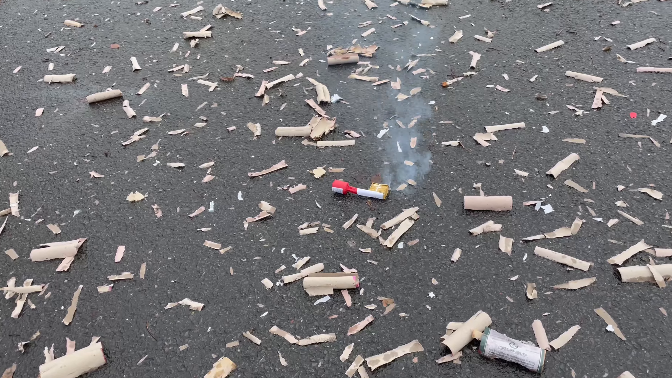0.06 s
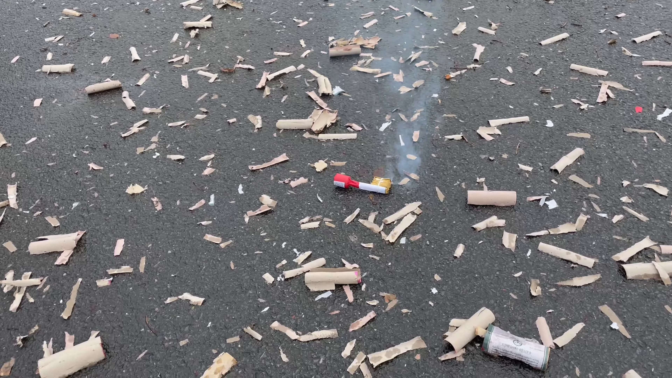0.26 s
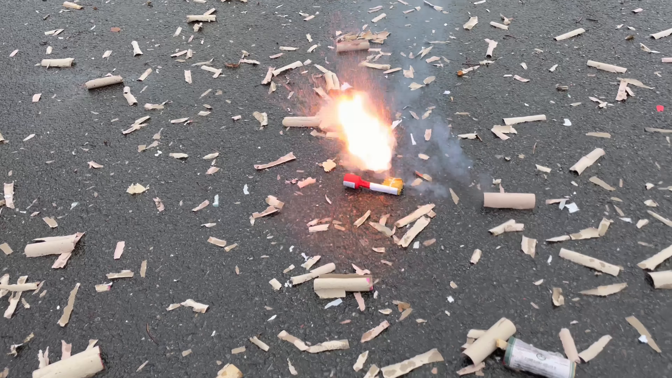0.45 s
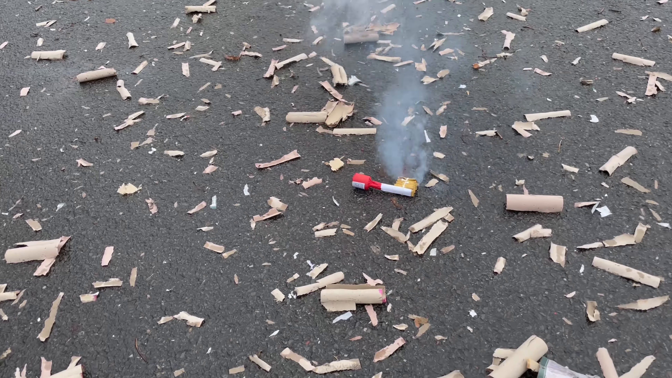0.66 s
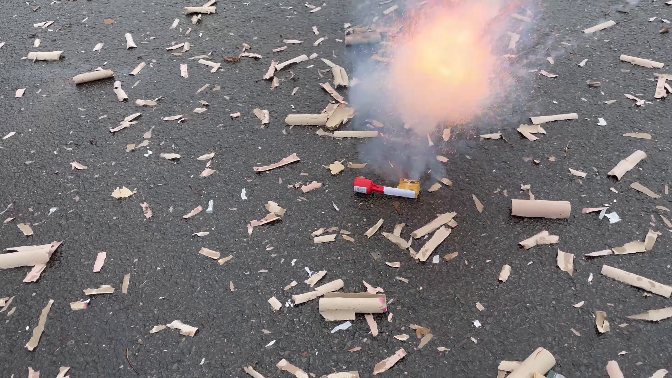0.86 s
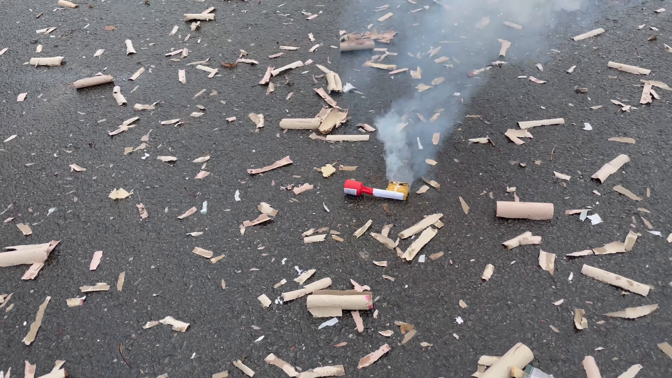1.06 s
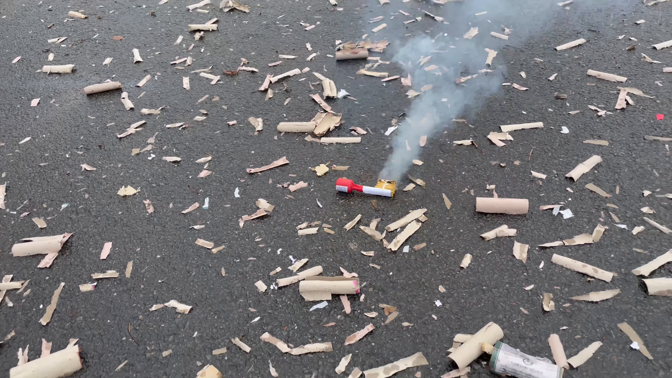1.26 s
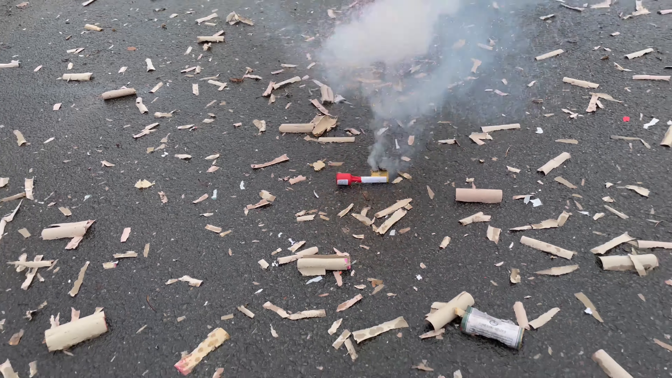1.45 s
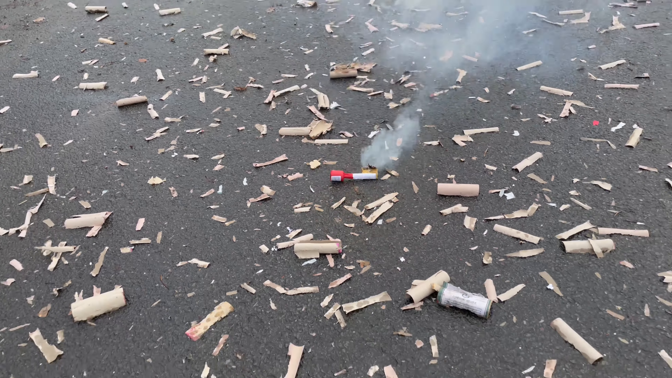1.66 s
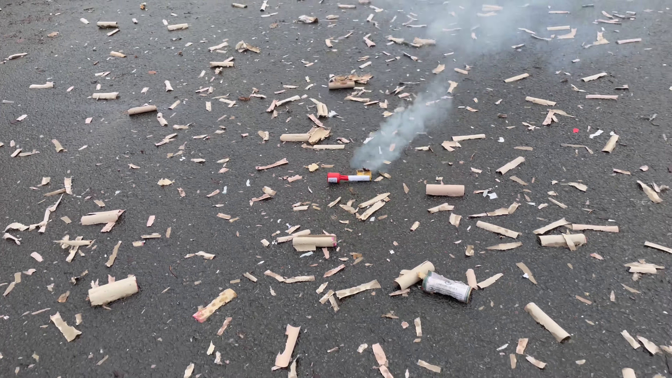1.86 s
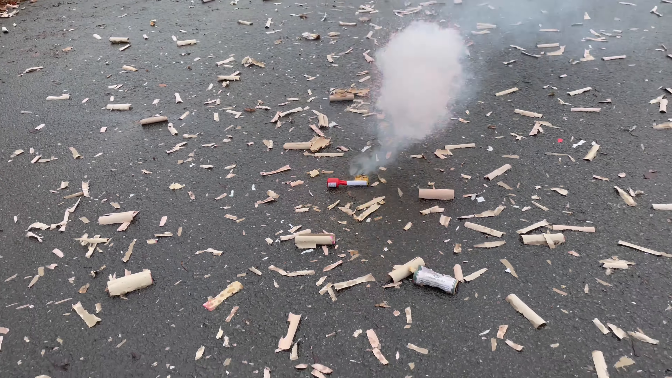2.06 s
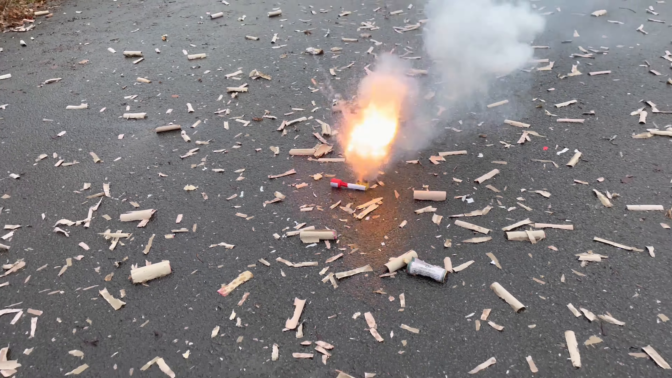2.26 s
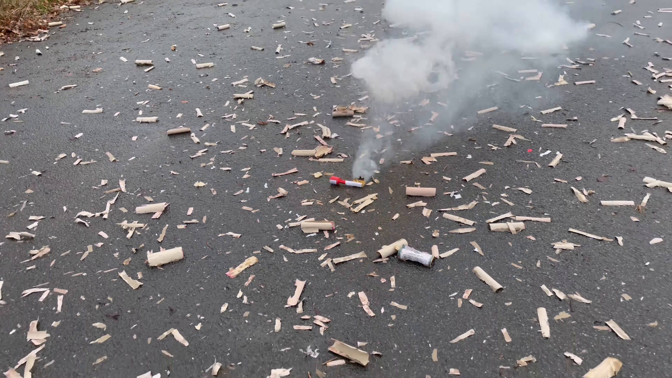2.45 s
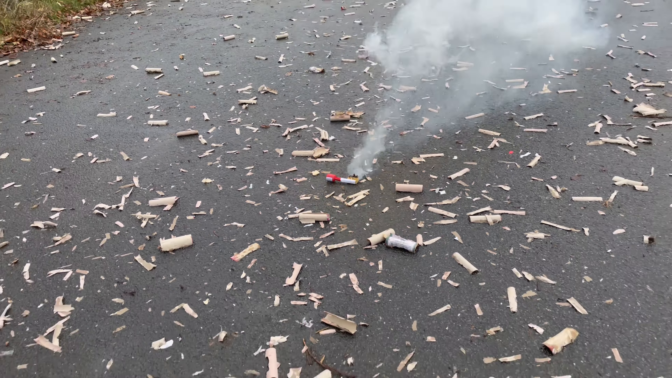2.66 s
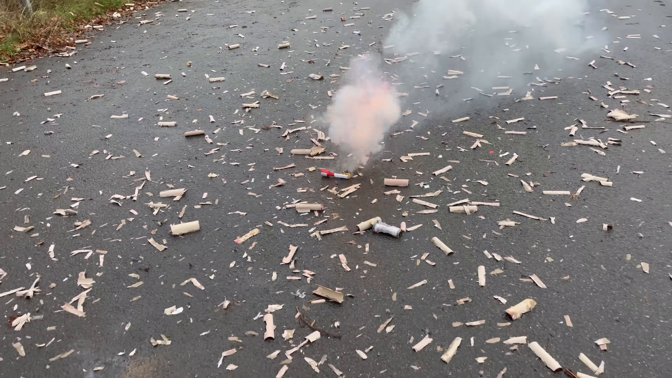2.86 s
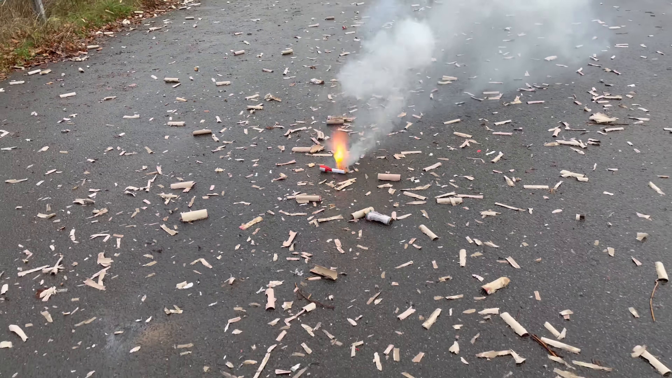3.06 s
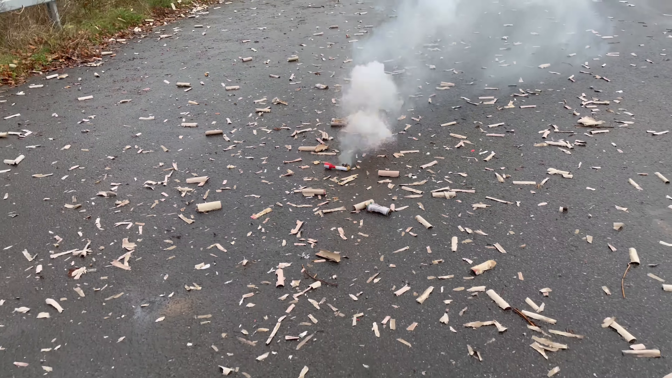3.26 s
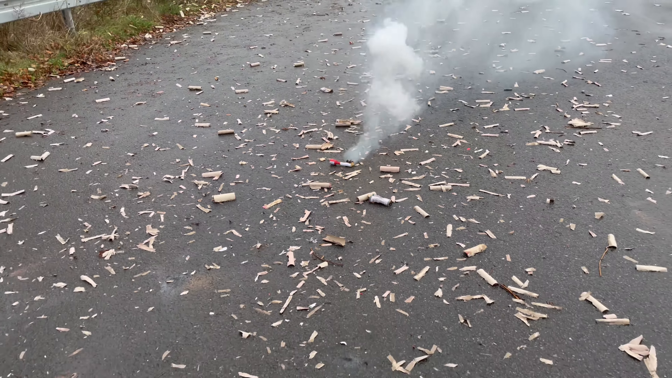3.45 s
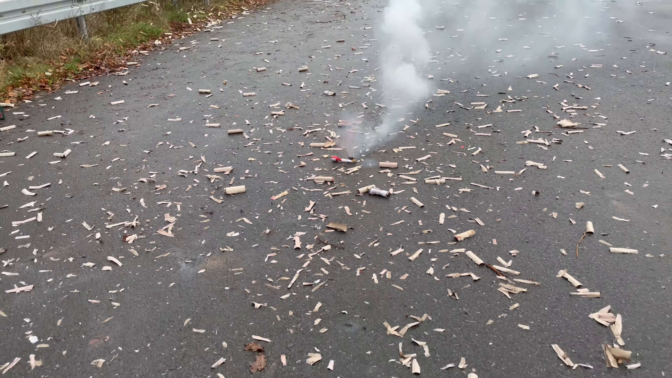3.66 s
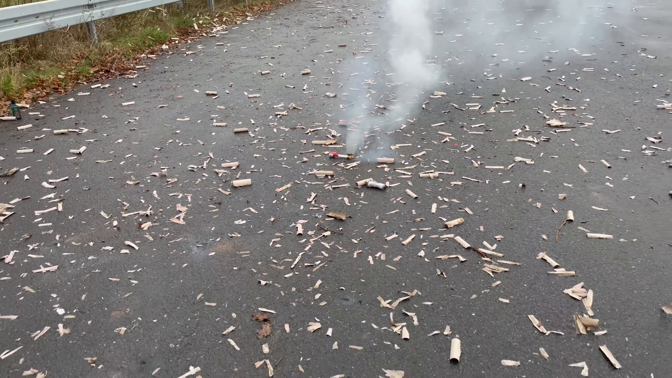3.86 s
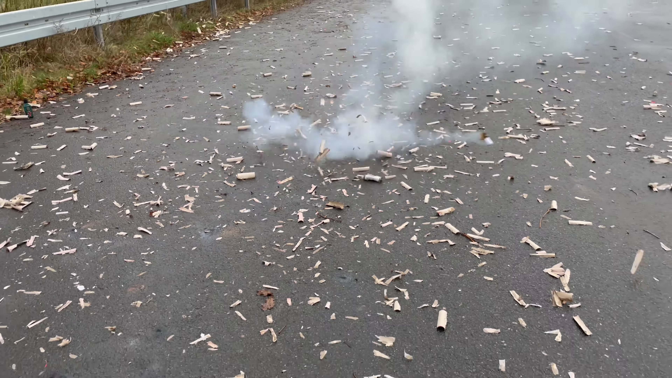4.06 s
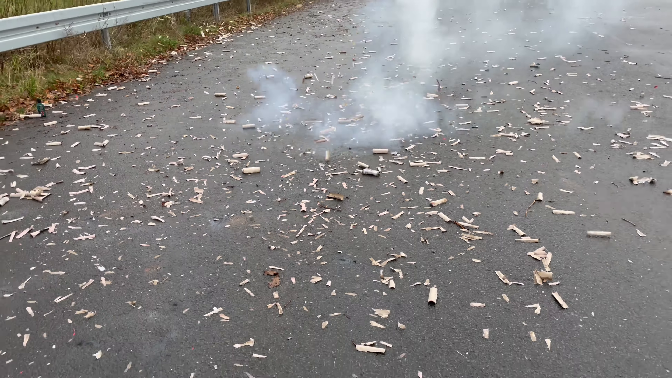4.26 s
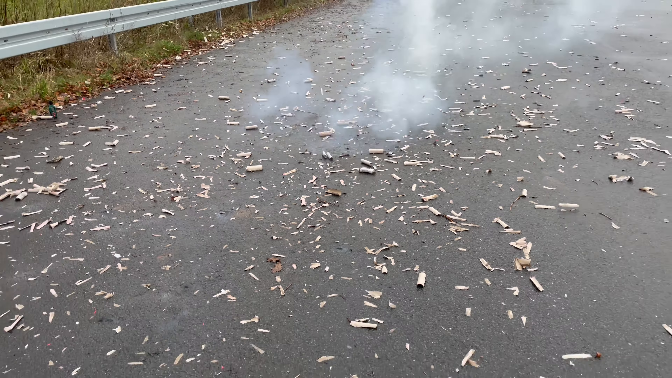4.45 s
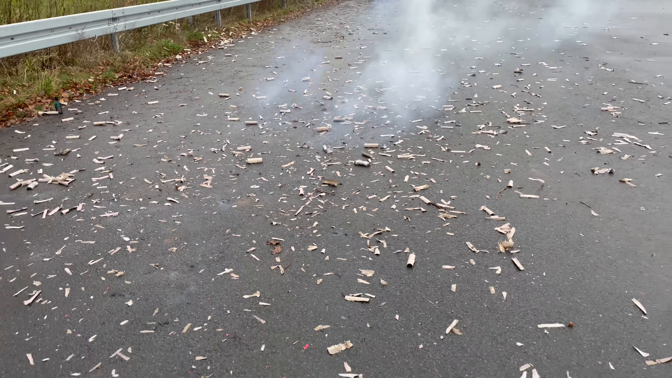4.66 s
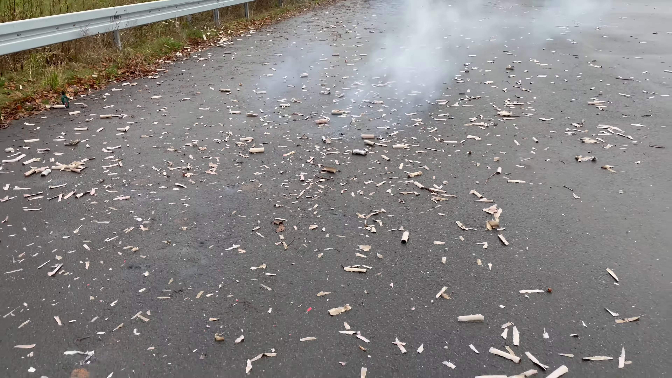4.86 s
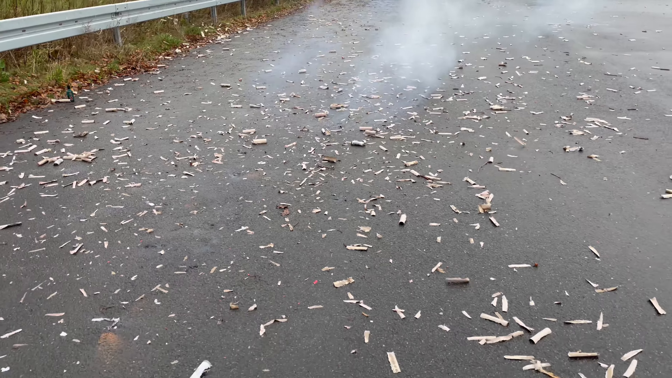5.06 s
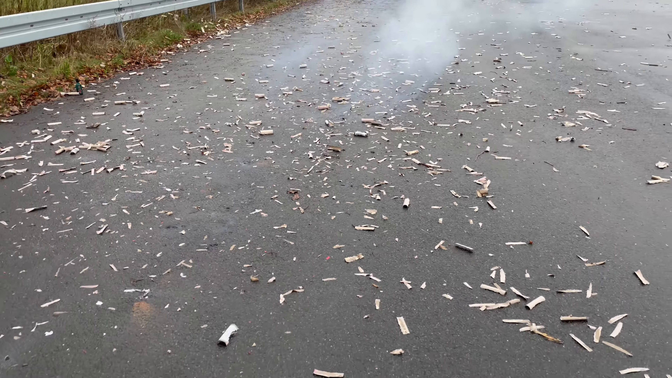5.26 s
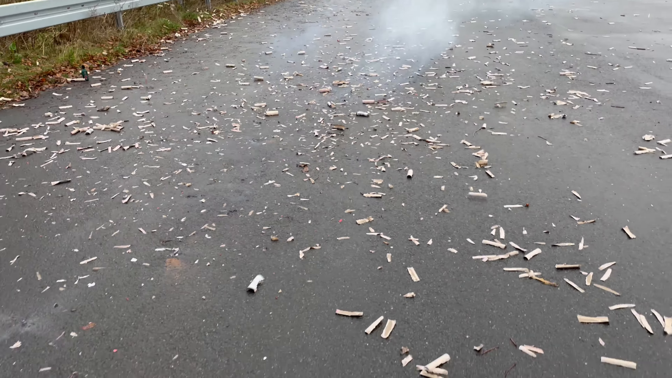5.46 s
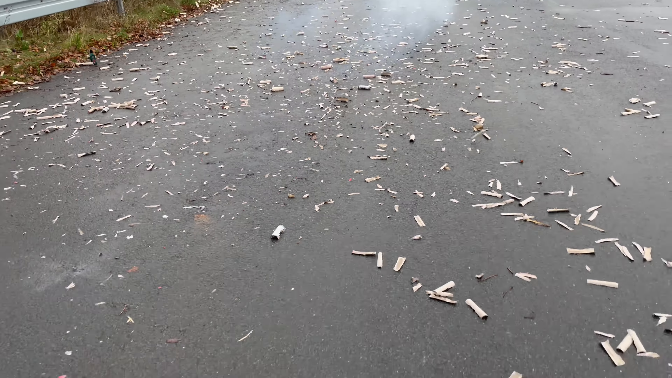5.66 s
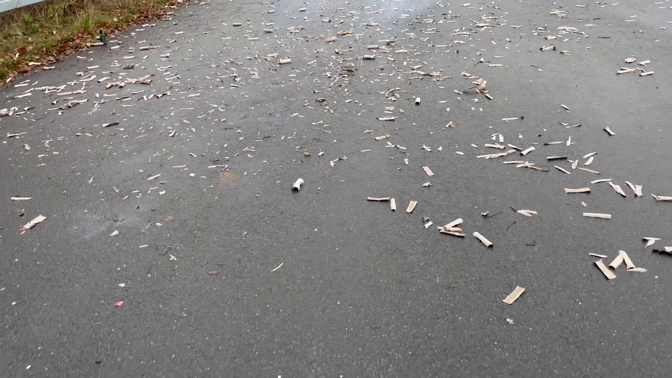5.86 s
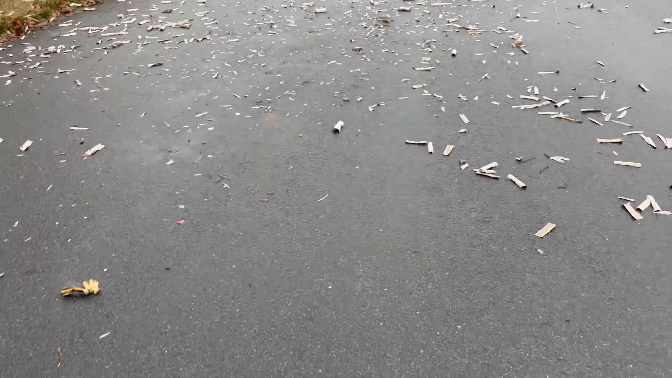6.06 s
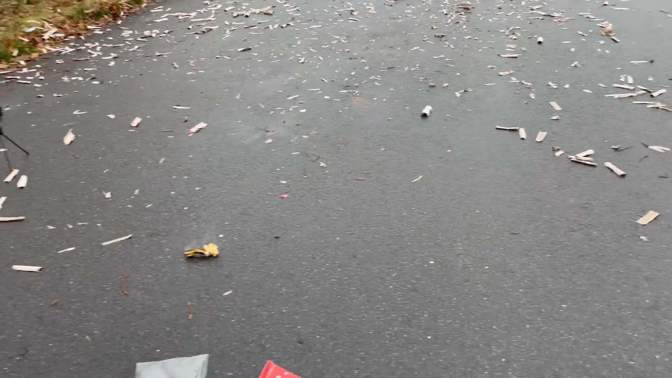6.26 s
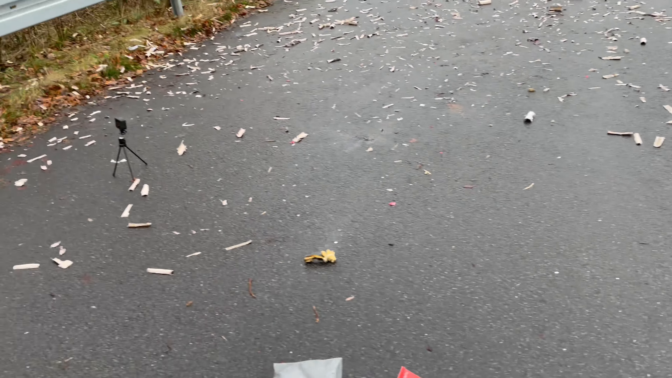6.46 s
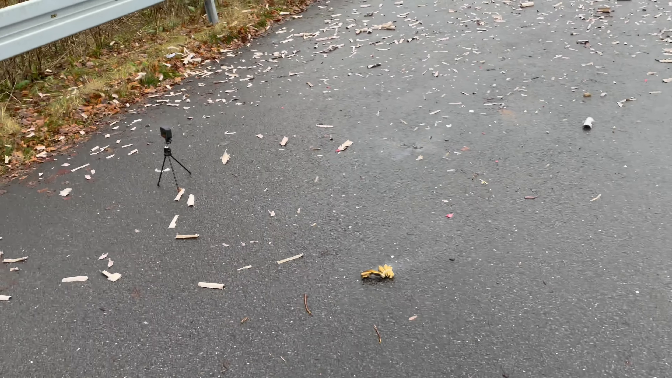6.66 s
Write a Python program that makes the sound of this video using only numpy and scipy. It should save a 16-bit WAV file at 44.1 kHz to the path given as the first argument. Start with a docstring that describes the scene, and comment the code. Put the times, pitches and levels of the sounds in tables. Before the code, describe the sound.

A fuse spits and hisses, then dry firecracker bangs come singly and in close pairs, slightly left, with short grainy reflections from verge and trees. A hiss flares before the eighth, weaker one; the ninth is deeper and louder, its long wash sinking in pitch. Wind rumbles throughout in short swells, finally thudding and crackling hard at the microphone, mostly left, over faint cloth-like brushing.

```python
"""Eight sharp bangs of a firecracker on a wet road, a fuse hissing between them, then a ninth, bigger burst.
Each bang is a swelling rush of gas noise, a spitting noise crack with a shock, and a thump falling in pitch.
A near slap, single echoes and a grainy wash from verge and woods answer, all filtered from the same blast.
Wind noise rumbles and buffets the two microphone ports; close by, soft noise rustles and two sines squeak."""
import sys
import numpy as np
from scipy import signal
from scipy.fft import rfft, irfft
from scipy.io import wavfile
from scipy.ndimage import uniform_filter1d

SR = 44100
rng = np.random.default_rng(int(sys.argv[2]) if len(sys.argv) > 2 else 0)


def inscribe(sig):
    """Save sig as 16-bit PCM at rate SR to the path in sys.argv[1].

    A 1-D sig is mono; a 2-D sig holds one channel per row.
    Samples are clipped to [-1, 1] before scaling.
    """
    pcm = np.round(np.clip(np.atleast_2d(sig).T, -1, 1) * 32767)
    wavfile.write(sys.argv[1], SR, pcm.astype(np.int16))


N = 296205
TIME = np.arange(N) / SR

# Levels in the tables are relative: the functions add their own trims and the balance of the ports.
# The bangs, one a row: t/s, crack level/dB, crack decay/s, crack tilt/dB per doubling of (1 + f/1 kHz),
#  gas rush level/dB, rush rise/s, rush tilt/dB per doubling of (1 + f/1 kHz), thump level/dB,
#  thump start f/Hz, thump slowing (ratio), thump time to peak/s, low push level/dB, push f/Hz,
#  phase offset of the right port/turns, blast level into the wash/dB, blast f/Hz, slap level/dB, echo level/dB
BANGS = [ (.4570, -14, .0016, -1.7, -11.5, .006, -1, -13, 1000, .8, .005, -23, 62, .38, 3, 1774, -8.5, -15),
         (.8061, -9, .0008, -2.2, -14.5, .0046, -2, -16, 1000, .7, .003, -27, 48, .4, 2.5, 1819, -9.5, -16),
         (1.3445, -15, .003, -1.7, -14, .0025, .2, -8.5, 1000, .8, .004, -30, 70, -.06, 2, 1700, -3.5, -12),
         (1.9502, -10, .0036, -1.5, -22, .004, -1.5, -9.5, 1100, .7, .0018, -38, 75, .33, 3.5, 1888, -3.5, -9),
         (2.2184, -6.5, .0048, -1.4, -22, .0038, -1.2, -13, 1300, .5, .0017, -15.5, 94, .43, 4, 2000, 0, -6),
         (2.7987, -12, .0043, -.8, -18, .0044, .5, -16, 1050, .7, .003, -24, 96, 0, 1, 1825, -5.5, -13),
         (3.084, -7, .0036, -4.3, -25, .0032, -4.5, -12, 1150, .7, .0023, -26, 92, 0, 2, 1500, -2.5, -10),
         (3.7085, -14, .0018, 2.2, -34, .017, 2.5, -22, 1000, .8, .002, -26, 88, 0, -4, 2412, -16, -21),
         (3.9948, -8, .0042, -4.8, -17, .006, -4.8, -2.5, 950, .42, .0034, -17, 56, -.25, 20, 466.3, 10, 2)]
# Colour of rushing gas, also of the short ticks: f/Hz, level/dB
RUSH_COLOUR = [(150, -9.5), (450, 3), (800, -5.5), (1500, -5.5), (3000, -5.5), (5000, -2), (7500, -2.5),
               (9500, -10), (12300, -4), (13800, -15), (16000, -18.5)]
# Hard buffets of wind on the microphone: t/s, level/dB, click level/dB
BUFFETS = [(5.268, -28, -50), (5.479, -28, -46), (5.511, -34, -57), (5.528, -31, -49), (5.564, -32, -52),
           (5.653, -28, -42), (5.686, -28, -44), (5.743, -26, -43), (5.753, -28, -47), (5.796, -27, -36),
           (5.833, -34, -49), (5.842, -32, -48), (5.907, -34, -55), (5.944, -31, -49), (5.962, -35, -48),
           (5.978, -29, -39), (5.994, -30, -44), (6.022, -25, -35), (6.036, -25, -37), (6.056, -21, -24),
           (6.072, -29, -46), (6.086, -23, -31), (6.099, -26, -36), (6.146, -35, -53), (6.168, -34, -53),
           (6.253, -25, -45), (6.276, -38, -56), (6.504, -37, -62)]


def amp(db):
    """Decibels to gain."""
    return 10 ** (np.asarray(db) / 20)


def unit(x):
    """Scales to rms 1."""
    return x / np.sqrt(np.mean(x ** 2) + 1e-20)


def read(points, hz):
    """A spectrum in dB, joined on a log-frequency axis."""
    f, db = np.transpose(points)
    return np.interp(np.log(hz + 1), np.log(f), db)


def curve(rows, t):
    """Gain along rows of (s, dB)."""
    return amp(np.interp(t, *np.transpose(rows)))


def add(mix, s, sound):
    """Mixes a sound in at time s."""
    part = mix[:, max(round(s * SR), 0):][:, :sound.shape[-1]]
    part += sound[..., :part.shape[1]]


def band(x, hz, kind, order=2):
    """Butterworth low-pass or high-pass."""
    return signal.sosfilt(signal.butter(order, min(hz, .45 * SR), kind, fs=SR, output="sos"), x)


def noise(colour, size, likeness, tilt_db=0):
    """Two channels of coloured noise, rms 1 together, correlated by likeness."""
    hz, c = np.fft.rfftfreq(size, 1 / SR), np.clip(likeness, -1, 1)
    a, b = rng.standard_normal((2, size))
    gain = amp(read(colour, hz) + tilt_db * np.log2(hz / 1000 + 1))
    pair = [a, c * a + np.sqrt(1 - c * c) * b]
    return unit(irfft(rfft(pair) * gain, size))


def hump(u):
    """Rises to 1 at u = 1, then dies away."""
    return u * np.exp(1 - u)


def bell(s, spread_s):
    """A smooth Gaussian swell of height 1 around time s."""
    return np.exp(-.5 * ((TIME - s) / spread_s) ** 2)


def shock(depth_hz, size=512):
    """A blast wave of energy 1: a sudden rise, then suction."""
    u = 2 * np.pi * depth_hz * np.arange(size) / SR
    wave = np.diff(u * np.exp(-u))
    return wave / np.linalg.norm(wave)


def thump(t, hz, stretch, length, lag_turns):
    """A swing of pressure that slows with each cycle, at both ports."""
    turns = np.log1p(stretch * hz * t) / stretch
    return -hump(t / length) * np.sin(2 * np.pi * (turns - np.array([[0], [lag_turns]])))


def outdoor_air(level_db=-61.5):
    """Still outdoor air: steady noise, nearly independent at the two ports."""
    # Colour of the air: f/Hz, level/dB
    air_colour = [(24, -29), (40, -5.5), (80, -6.5), (540, -22), (1100, -24.5), (3300, -38.5), (8000, -49),
                  (12500, -50), (16000, -67)]
    return amp(level_db) * noise(air_colour, N, 0.086)


def wind(flutter_db=-1.0, breeze_flutter_db=-8.5, lump_db=4.8, wake_s=0.016):
    """Lumpy turbulence, different at each port: a breeze, short swells, and a wake around every buffet."""
    # Colour of the turbulence: f/Hz, level/dB
    wind_colour = [(20, -21), (50, -1), (90, 1), (160, -5), (300, -7), (450, -12.5), (700, -21.5),
                   (1200, -30), (3000, -42.5), (8000, -78.5)]
    # Strength of the breeze at the microphone: t/s, level/dB
    breeze = [(0, -45), (.14, -40), (.38, -43), (.56, -48), (.8, -54), (.9, -66), (1.1, -59), (1.5, -56),
              (2.05, -65), (2.35, -52), (2.54, -58), (2.64, -41.5), (3.05, -36.5), (3.35, -48), (3.75, -42),
              (4.15, -54), (4.55, -37), (4.92, -45), (5.1, -41), (5.4, -47), (6.15, -38), (6.35, -52),
              (6.72, -60.5)]
    # Short swells of rumble and flutter; those at 4.15 and 4.37 s thicken the last burst's wash:
    #  t/s, rumble level/dB, flutter level/dB, Gaussian spread/s
    short_swells = [(.14, -44.5, -45, 0.016), (.33, -37, -51, 0.0071), (.69, -43, -65, .06),
                    (2.45, -44, -70, .05), (2.625, -32, -40, 0.021), (2.7, -47, -50, 0.011),
                    (2.98, -32.5, -64, 0.018), (3.03, -33.5, -60, 0.013), (3.2, -30.5, -38.5, .02),
                    (3.48, -28.5, -39, 0.021), (3.735, -29.5, -35, 0.024), (3.79, -29.5, -33, 0.0091),
                    (3.93, -36, -38, 0.023), (4.15, -45, -26, .005), (4.37, -45, -30, 0.026),
                    (4.51, -32, -34, 0.026), (4.69, -34, -37, .025), (4.81, -27, -33, 0.015),
                    (4.96, -37.5, -35.5, 0.017), (5.12, -38, -38.5, 0.07), (5.545, -37, -34.5, 0.025),
                    (6.065, -23, -29, 0.034), (6.26, -32, -37, 0.014)]
    wakes = [(s, db - 14, db - 15, wake_s) for s, db, _ in BUFFETS]
    rumble_power = curve(breeze, TIME) ** 2
    flutter_power = rumble_power * amp(breeze_flutter_db) ** 2
    for s, rumble, flutter, spread_s in list(short_swells) + wakes:
        swell = bell(s, spread_s) ** 2
        rumble_power = rumble_power + amp(rumble) ** 2 * swell
        flutter_power = flutter_power + amp(flutter) ** 2 * swell
    low = np.sqrt(rumble_power) * unit(band(noise(wind_colour, N, -0.45), 170, "low"))
    eddies = band(band(noise(wind_colour, N, 0), 290, "high"), 650, "low", order=1)
    high = amp(flutter_db) * np.sqrt(flutter_power) * unit(eddies)
    lumps = unit(amp(lump_db * unit(band(rng.standard_normal((2, N)), 18, "low"))))
    return (low + high) * lumps * amp([[1.], [-1.]])  # a little stronger at the left port


def buffets(flap_db=-4.5, length_s=0.00305, snap_db=13, snap_hz=800, trail_db=-12, trail_s=.03, count=2):
    """Eddies break on the ports, mostly the left; the harder, the brighter. Weaker ones trail each."""
    # Colour of a flap: f/Hz, level/dB
    flap_colour = [(40, -9), (150, -11), (400, 3.5), (800, -1.5), (1500, -10.5), (3000, -18), (8000, -11)]
    out, u = np.zeros((2, N)), np.arange(2048) / SR / length_s
    side = amp([[2.5], [-2.5]])
    trailing = []
    for s, db, _ in BUFFETS:
        for _ in range(count):
            trailing.append((s + trail_s * rng.uniform(0.201, 1), db + trail_db))
    for s, db, *_ in list(BUFFETS) + trailing:
        flap = amp(flap_db) * hump(u) * noise(flap_colour, len(u), 0)
        add(flap, length_s / 2, amp(snap_db) * shock(snap_hz))
        corner_hz = 1900 * 2 ** ((db + 18.5) / 22)  # an octave brighter for each 22 dB
        add(out, s, amp(db) * side * band(flap, corner_hz, "low", order=4))
    return out


def clicks(length_s=.0011):
    """Each buffet breaks with a dry click, mostly at the left port: a very short hump of noise."""
    # Colour of a click: f/Hz, level/dB
    click_colour = [(300, -6), (900, 0), (1900, 0), (2700, -9), (3800, -21), (5000, -34), (7000, -52),
                    (12000, -65)]
    out, u = np.zeros((2, N)), np.arange(1024) / SR / length_s
    for s, _, db in BUFFETS:
        add(out, s, amp(db) * hump(u) * noise(click_colour, len(u), .1))
    return out * amp([[2.], [-2.]])


def rustles():
    """Soft brushing, like cloth moving near the microphone: smooth swells of noise."""
    # The rustles: t/s, level/dB, Gaussian spread/s
    brushes = [(4.886, -66.5, .015), (5.177, -59, 0.024), (5.438, -67, 0.022), (5.642, -66, .03),
               (6.02, -69.5, 0.18), (6.39, -68.5, 0.013)]
    # Their colour: f/Hz, level/dB
    brush_colour = [(1000, -4), (3000, 1), (4800, -1), (6600, 1), (8400, 1), (10000, -9), (12500, -3),
                    (16000, -25)]
    swells = sum(amp(db) * bell(s, spread_s) for s, db, spread_s in brushes)
    return swells * noise(brush_colour, N, 0.29)


def squeak(s=6.18, spread_s=.025):
    """A faint, thin, brief squeak of two sine partials."""
    # Its partials: f/Hz, level/dB
    partials = [(2697, -72), (4565, -79)]
    return bell(s, spread_s) * sum(amp(db) * np.sin(2 * np.pi * hz * TIME) for hz, db in partials)


def woods(far_db, rise_s, hold_s, fall_db_per_s, surge_db, tint, roll_db):
    """Grainy reflections from verge and trees; the air takes more treble the longer they travel."""
    # Colour of the wash: f/Hz, level/dB
    woods_colour = [(50, -13.5), (150, -4), (350, 3), (900, -.5), (2200, -2), (5000, -.5), (7500, 1),
                    (9500, -3), (12300, 3.5), (14000, -20), (16000, -35)]
    wash_db, air_loss_db = -10, 4.5  # the loss is per kHz and second
    grains = unit(amp(unit(band(rng.standard_normal(2 * SR), 250, "low"))))  # trunks answer one by one
    hz, t, z = signal.stft(grains * noise(woods_colour, 2 * SR, 0.07), SR, nperseg=512)
    hz = hz[:, None]
    # random patches over time and frequency, and lumps over time alone
    patches = uniform_filter1d(rng.standard_normal(z.shape[1:]), 2, 1)
    patches_db = 2.5 * unit(uniform_filter1d(patches, 24, 0))
    lumps_db = unit(uniform_filter1d(rng.standard_normal(len(t)), size=4))
    # one surge comes back from the far slope
    surge = surge_db * np.exp(-.5 * ((t - .378) / .02) ** 2) / (1 + (hz / 3500) ** 2)
    # a boom that sinks in pitch from 540 Hz, .45 octaves wide
    boom_hz = 540 * np.exp(-t / .75)
    roll = roll_db * np.exp(-.5 * (np.log2((hz + 1) / boom_hz) / .45) ** 2)
    near = amp(4.5 - 196.5 * t)  # the wash of the verge dies fast
    fade_db = fall_db_per_s * np.maximum(t - hold_s, 0)
    far = (1 - np.exp(-t / rise_s)) * amp(far_db - fade_db + surge + roll + lumps_db + read(tint, hz))
    shape = np.hypot(near, far) * amp(patches_db - air_loss_db * t * hz / 1000)
    tail = signal.istft(z * shape, SR, nperseg=512)[1]
    return amp(wash_db) * tail / np.linalg.norm(tail[0])


def scatter(spread_s, size=2048):
    """A reflection from an uneven thing: a short dying smear of energy 1."""
    smear = rng.standard_normal((2, size)) * np.exp(-np.arange(size) / SR / spread_s)
    smear[1] += smear[0]  # both ports hear much the same
    return smear / np.linalg.norm(smear, axis=1, keepdims=True)


def surroundings(slap_spread_s=0.0017, slap_top_hz=6000, echo_bottom_hz=750):
    """Every blast comes back as a near slap, a few echoes and the wash of the woods."""
    # Single echoes from farther things: delay t/s, level/dB, low-pass f/Hz, smear/s
    reflectors = [(.0225, -4, 7000, .001), (.0575, -9.5, 7500, .002), (.1165, -1.5, 2200, .003),
                  (.153, -9, 2200, .014)]
    # Wash of the nearby trees: level/dB, rise/s, hold/s, fall/dB per s
    trees = (-7, .14, .2, 56)
    # Wash of the last burst, which carries much farther and rolls back: level/dB, rise/s, hold/s, fall/dB per s
    far_woods = (-10.5, 0.0146, 0.45, 23)
    # How the wash of the trees differs from the near one: f/Hz, level/dB
    trees_tint = [(300, 0), (600, 3), (1000, 2), (2400, 3.5), (5000, -1), (12000, -4)]
    # How the last burst's far wash differs from the near one: f/Hz, level/dB
    far_tint = [(150, 5), (280, 3), (600, -1), (1000, -.5), (2400, 1), (5000, .5), (12000, -1)]
    out, echoes = np.zeros((2, N)), np.zeros((2, SR // 4))
    for delay, db, dull_hz, spread_s in reflectors:
        echo = band(scatter(spread_s), dull_hz, "low", order=3)
        add(echoes, delay, amp(db) * band(echo, echo_bottom_hz, "high"))  # small things throw back little bass
    tree_wash = woods(*trees, surge_db=4, tint=trees_tint, roll_db=0)
    last_wash = woods(*far_woods, surge_db=8.5, tint=far_tint, roll_db=5)
    washes = [tree_wash] * (len(BANGS) - 1) + [last_wash]
    for (s, *_, blast_db, depth_hz, slap_db, echo_db), wash in zip(BANGS, washes):
        wave = shock(depth_hz)[None]
        slap = signal.fftconvolve(wave, scatter(slap_spread_s), axes=1)
        slap_delay = .0186 - .00095 * s  # sooner as the microphone backs away
        add(out, s + slap_delay, amp(slap_db) * band(slap, slap_top_hz, "low", order=1))
        add(out, s, amp(echo_db) * signal.fftconvolve(wave, echoes, axes=1))
        add(out, s, amp(blast_db) * signal.fftconvolve(wave, wash, axes=1))
    return out


def fuse(smoulder_db=-80, hiss_db=-1, flicker_db=0.5, sputter_db=4):
    """The fuse hisses, the flame roars and sputters: flaring noise and short puffs of it."""
    # Colour of the hiss: f/Hz, level/dB
    fuse_colour = [(530, -29), (900, -14), (1400, -11.5), (2200, -13), (5000, -5), (7000, -7), (9300, -12),
                   (12200, 3), (13800, -11), (16000, -21)]
    # Colour of the roar: f/Hz, level/dB
    flame_colour = [(120, -26.5), (250, 1.5), (900, -9), (1300, -12.5), (4600, -18), (6800, -16.5),
                    (9300, -30), (12400, -20), (14000, -36), (16000, -36.5)]
    # Flares, mostly just before a bang: peak t/s, hiss level/dB, roar level/dB, rise/s, fall/s
    flares = [(.41, -60, -40.5, .6, 0.019), (.42, -44.5, -43, 0.05, 0.016), (.8, -46, -47, 0.08, 0.01),
              (1.0, -62, -62, 0.068, 0.2), (1.66, -62, -62, 0.036, 0.1), (1.94, -62, -101, 0.1, .01),
              (3.59, -49, -52.5, 0.053, .035), (3.71, -37, -34, 0.022, 0.024), (3.77, -56, -69, .02, 0.1)]
    # Sputters of the flame: t/s, level/dB, f/Hz, time to peak/s
    sputters = [(0.133, -35, 342.6, 0.0035), (0.158, -38, 347, 0.0029), (0.259, -38.5, 520, 0.0039),
                (0.261, -43, 1700, 0.0022), (0.279, -38, 747, 0.0043), (0.364, -36, 960, 0.003),
                (0.647, -49, 1840, 0.002), (3.355, -54, 750, 0.013), (3.685, -37, 1480, 0.001)]
    hiss_power, roar_power = amp(smoulder_db) ** 2, 0
    for s, hiss, roar, rise, fall in flares:
        flare = np.exp(np.minimum((TIME - s) / rise, (s - TIME) / fall))
        hiss_power = hiss_power + (amp(hiss + hiss_db) * flare) ** 2
        roar_power = roar_power + (amp(roar) * flare) ** 2
    flicker = amp(flicker_db * unit(band(rng.standard_normal(N), 76, "low")))
    hissing = np.sqrt(hiss_power) * noise(fuse_colour, N, 0.24)
    roaring = np.sqrt(roar_power) * noise(flame_colour, N, 0.043)
    out = flicker * (hissing + roaring) * (TIME < BANGS[-1][0])  # the last burst puts it out
    t = np.arange(2000) / SR
    for s, db, hz, length in sputters:
        puff_colour = [(hz / 2, -25), (hz, 0), (hz * 2, -22), (hz * 10, -50)]
        puff = noise(puff_colour, len(t), 0.18)
        add(out, s, amp(db + sputter_db) * hump(t / length) * puff)
    return out


def ticks(decay_s=0.0086):
    """Short dying ticks of noise, one of them an echo of a bang."""
    # The ticks; the one at 1.456 s is the echo: t/s, level/dB
    tick_rows = [(1.456, -40.5), (1.638, -38.5), (1.702, -44), (3.6692, -28), (4.709, -53.5),
                 (4.777, -57.5), (5.04, -57)]
    out, t = np.zeros((2, N)), np.arange(2000) / SR
    for s, db in tick_rows:
        add(out, s, amp(db) / 2 * np.exp(-t / decay_s) * noise(RUSH_COLOUR, len(t), 0.17))
    return out


def small_thuds(stretch=.42, length_s=.0035, lag_turns=.2):
    """Small thuds sinking in pitch, several of them echoes of the thumps."""
    # The thuds: t/s, level/dB, start f/Hz
    thuds = [(.574, -42, 500), (.648, -41, 1100), (.686, -42, 900), (.944, -46, 900), (1.502, -48, 800),
             (2.102, -42, 1100), (2.293, -41, 700)]
    out, t = np.zeros((2, N)), np.arange(2000) / SR
    for s, db, hz in thuds:
        add(out, s, amp(db) * thump(t, hz, stretch, length_s, lag_turns))
    return out


def swelling_tones(lead_s=.026, fade_in_s=.005, stop_s=.0012, waver=.02, lag_turns=.25):
    """Thin wavering tones swell up around some bangs and stop abruptly."""
    # The tones: peak t/s, f/Hz, level/dB, rise/s
    tones = [(.456, 441, -20, .011), (.456, 651, -14, .013), (.456, 813, -17, .008),
             (.8061, 590, -20, .007), (1.3445, 640, -17, .003), (1.3445, 1250, -15, .003),
             (2.2184, 490, -24, .005), (2.7987, 637, -25, .0044), (3.995, 1066, -27, .008),
             (3.995, 2546, -30, .01), (3.993, 3700, -28, .004), (3.995, 4597, -30, .009),
             (3.997, 5150, -27, .008), (4.011, 5150, -18, .002)]
    out, t = np.zeros((2, N)), np.arange(-round(lead_s * SR), 500) / SR
    ports = np.array([[0], [lag_turns]])
    for s, hz, db, rise in tones:
        swell = np.exp(np.minimum(t / rise, -t / stop_s)) * np.minimum((t - t[0]) / fade_in_s, 1)
        wander = waver * unit(band(rng.standard_normal(len(t)), 300, "low"))
        turns = np.cumsum(hz * (1 + wander)) / SR
        add(out, s - lead_s, amp(db) * swell * np.sin(2 * np.pi * (turns - ports)))
    return out


def tube(x):
    """The cardboard tube rings as the gas leaves it: resonances added to a sound."""
    # Its resonances: f/Hz, width/Hz, level/dB
    resonances = [(447, 46, 1.5), (810, 39, -0.5), (1150, 31, 1), (2430, 180, 0), (2794, 190, 2.5),
                  (3600, 17, 2.5), (6660, 200, 8), (7060, 84, 5), (8070, 300, 6.5), (12050, 200, 4)]
    out = x
    for hz, width, db in resonances:
        b, a = signal.iirpeak(hz, hz / width, fs=SR)
        out = out + (amp(db) - 1) * signal.lfilter(b, a, x)
    return out


def shift_right(x, turns, below_hz=1300):
    """Turns the phase of the lower part of a sound at the right port."""
    hz = np.fft.rfftfreq(x.shape[1], 1 / SR)
    lag = np.exp(-2j * np.pi * turns / (1 + (hz / below_hz) ** 6))
    return np.array([x[0], irfft(rfft(x[1]) * lag, x.shape[1])])


def bangs(lead_s=0.034, shock_db=9, shock_hz=1100, spit_db=4.5, push_s=.009):
    """Gas rushes out ever harder, cracks, and leaves a falling thump, whose top comes back once from afar."""
    # Colour of the crack: f/Hz, level/dB
    crack_colour = [(100, -6.5), (450, 7), (750, 8), (1300, 2), (2600, -3), (4000, -8.5), (7000, -23.5),
                    (9500, -21.5), (12300, -0.5), (13800, -22.5), (16000, -20.5)]
    thump_echo_s, thump_echo_db, thump_echo_bottom_hz = .116, -14, 480
    out, t = np.zeros((2, N)), np.arange(-round(lead_s * SR), 3000) / SR
    after, before = np.maximum(t, 0), np.minimum(t, 0)
    for (s, crack_db, decay, crack_tilt_db, rush_db, rise, rush_tilt_db, thump_db, thump_hz, stretch,
         length, push_db, push_hz, lag, *_, echo_db) in BANGS:
        swell = np.exp(before / rise - after / 0.00026)
        rush = amp(rush_db) * swell * noise(RUSH_COLOUR, len(t), 0.03, rush_tilt_db)
        # the powder burns in jerks
        jerks = unit(amp(spit_db * unit(band(rng.standard_normal(len(t)), 1800, "low"))))
        burst = (t >= 0) * np.exp(-after / decay) * jerks
        crack = tube(amp(crack_db) * burst * noise(crack_colour, len(t), 0.5, crack_tilt_db))
        add(crack, lead_s, amp(crack_db + shock_db) * shock(shock_hz))
        swing = thump(after, thump_hz, stretch, length, lag)
        # the cloud shoves the air; here the phase offset has the opposite sign to the thump's
        push_turns = push_hz * after + np.array([[0], [lag]])
        push = amp(push_db) * hump(after / push_s) * np.sin(2 * np.pi * push_turns)
        add(out, s - lead_s, tube(rush) + shift_right(crack, lag) + amp(thump_db) * swing + push)
        thump_top = band(swing, thump_echo_bottom_hz, "high", order=3)
        add(out, s - lead_s + thump_echo_s, amp(echo_db + thump_echo_db) * thump_top)
    return out


def port_pair(x):
    """In the treble the right port hears the left's sound shifted in phase; each adds peaks and notches."""
    # How alike the treble is at the two ports: f/Hz, likeness (0-1)
    treble_likeness = [(1500, 0), (2500, .12), (5700, .1), (6800, .5), (7900, .3), (9200, .92), (10500, .7),
                       (13500, .97)]
    # Phase by which the right port lags: f/Hz, lag/rad
    treble_lag = [(2200, 0), (3500, 1), (5300, 1.6), (5800, 3.6), (6800, 6), (7500, 4.5), (8400, 3.3),
                  (9500, 3), (13300, 0)]
    # Peaks and notches of the ports: f/Hz, Gaussian spread/Hz, left level/dB, right level/dB
    port_colour = [(5200, 150, 6, 3), (5620, 190, -6, -8), (6150, 250, 2, 0), (7550, 250, -4, -5),
                   (7950, 120, 3, 0), (9200, 900, 4.5, 5.5), (15200, 900, 4, 4)]
    hz, (left, right) = np.fft.rfftfreq(N, 1 / SR), rfft(x)
    c = np.clip(np.interp(hz, *np.transpose(treble_likeness)), 0, 1)
    lag = np.exp(-1j * np.interp(hz, *np.transpose(treble_lag)))
    colour_db = np.zeros((2, len(hz)))
    for centre, width, left_db, right_db in port_colour:
        colour_db += np.outer([left_db, right_db], np.exp(-.5 * ((hz - centre) / width) ** 2))
    right = c * lag * left + np.sqrt(1 - c * c) * right
    return irfft(np.array([left, right]) * amp(colour_db), N)


def scene():
    """The firecracker slightly to the left, its echoes, the wind, rustles and still outdoor air."""
    at_ports = wind() + buffets() + clicks()
    close_by = rustles() + squeak()
    firecracker = surroundings() + fuse() + ticks() + small_thuds() + swelling_tones() + bangs()
    firecracker = firecracker * amp([[.6], [-.6]])
    return port_pair(outdoor_air() + close_by + firecracker) + at_ports


def record(dry, ceiling=.85, edge_hz=16000):
    """The loudest peaks overload softly; then a low-pass sets the band limit."""
    squashed = ceiling * np.tanh(dry / ceiling)
    lowpass = signal.firwin(511, edge_hz, window=("kaiser", 9), fs=SR)
    return signal.oaconvolve(squashed, lowpass[None], "same")


dry = scene()
out = record(dry)
inscribe(out)
```